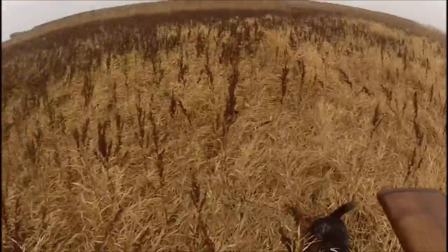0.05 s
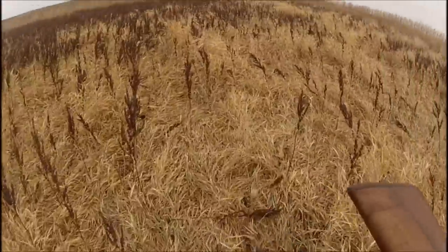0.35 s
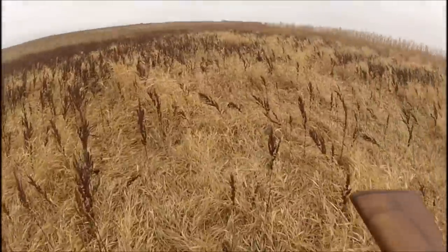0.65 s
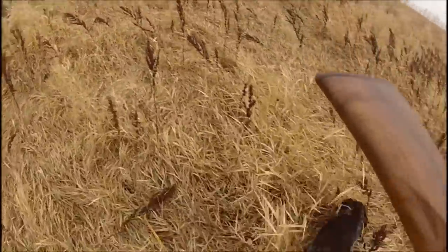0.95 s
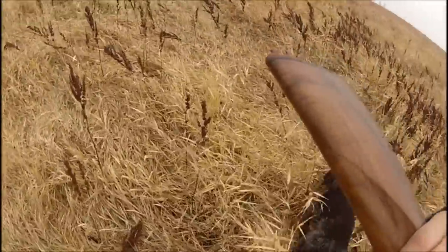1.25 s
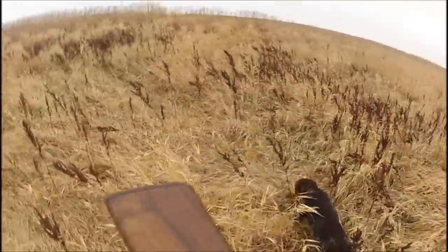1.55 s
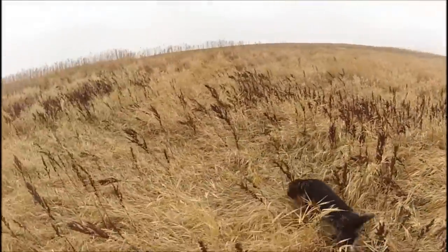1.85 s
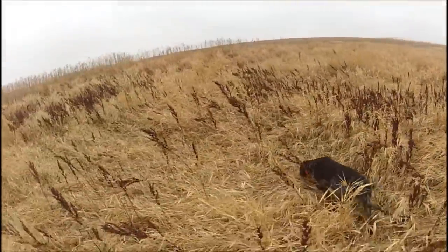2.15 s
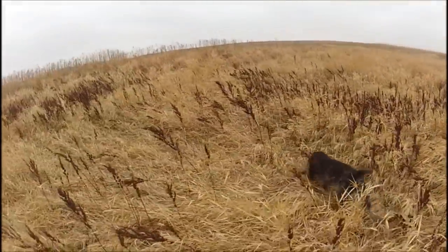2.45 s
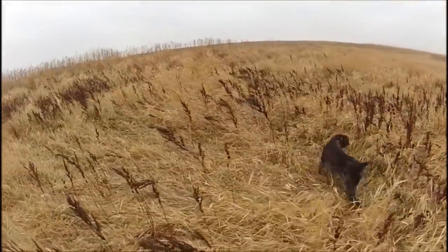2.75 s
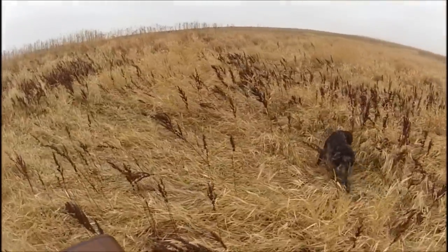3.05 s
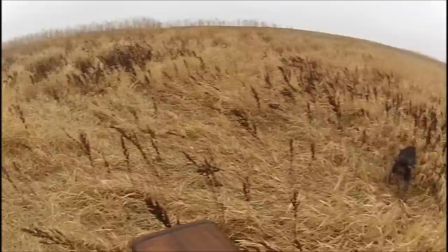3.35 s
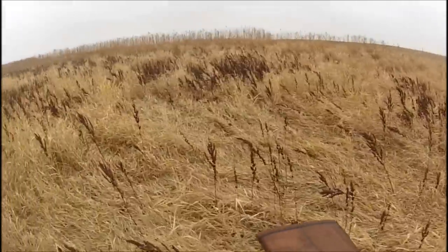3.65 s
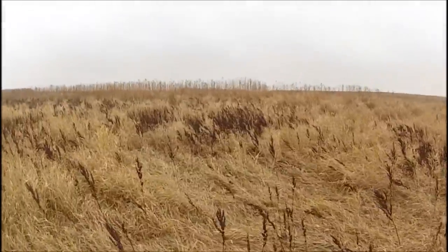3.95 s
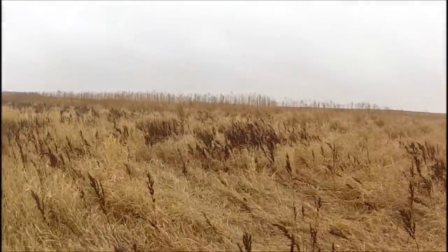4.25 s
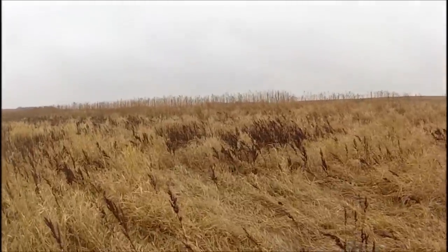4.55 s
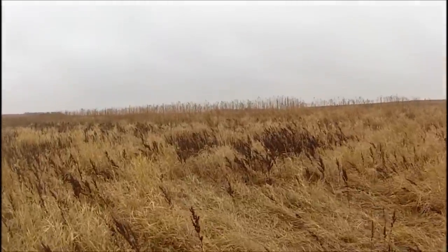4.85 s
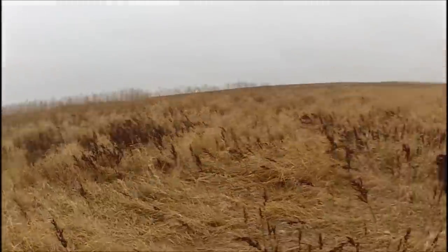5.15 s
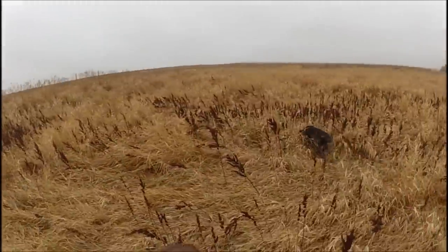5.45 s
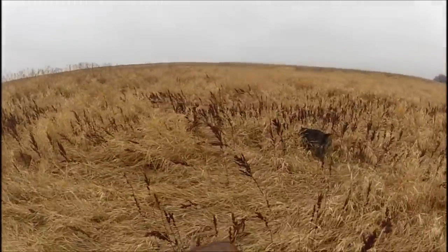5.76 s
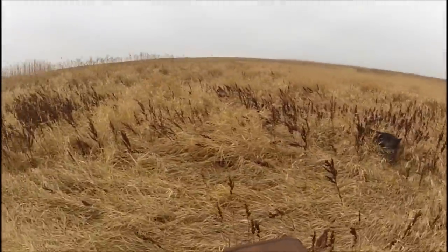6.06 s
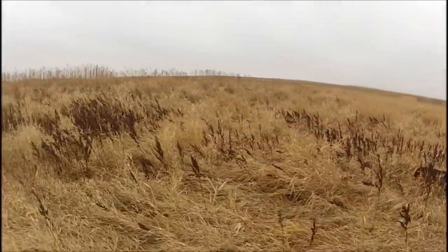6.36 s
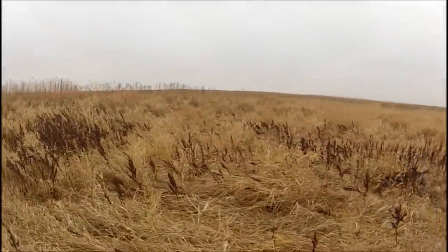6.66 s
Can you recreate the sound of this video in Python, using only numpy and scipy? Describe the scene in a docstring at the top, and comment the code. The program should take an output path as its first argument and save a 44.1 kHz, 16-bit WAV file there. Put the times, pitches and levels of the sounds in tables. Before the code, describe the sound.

Wind buffets a body-worn microphone in a closed plastic case, a low fluttering rumble with dull thumps through the first second. Beneath it, someone walks through tall dry grass: soft, crisp swishes come in uneven strokes throughout, with scattered tiny ticks of snapping stems. From about 1 to 2.5 seconds the wind nearly vanishes, exposing the rustle, faint clothing rubs and a few light, hollow knocks of gear on the case, near 1.1, 1.8 and 2.4 seconds. The wind returns at about 2.6 seconds and builds from 3.7. It is loudest between 4.6 and 5.4 seconds, with hard thumps, brief distorted rasps and one sharp hollow knock near 4.9. Weaker gusts continue over the swishing until the end at about 6.7 seconds. Everything is close, mono and somewhat muffled, with a thin fizz in the treble.

```python
"""Gusty wind on a camera microphone in a closed plastic case, carried through a field of tall dry grass.
The wind swells and drops; single gusts buffet the case and rumble in its cavity. Close by, blades swish
at each stroke of the legs and stems snap, while gear bumps the case and clothing rubs on it. Mono.
The camera samples at a low rate and holds each sample, which mirrors a thin fizz into the treble."""
import sys
import numpy as np
from scipy import signal
from scipy.fft import rfft, irfft, next_fast_len
from scipy.io import wavfile
from scipy.ndimage import uniform_filter1d, map_coordinates

SR = 44100
rng = np.random.default_rng(int(sys.argv[2]) if len(sys.argv) > 2 else 0)


def pcm_store(signal):
    """Save signal as 16-bit PCM."""
    levels = np.round(np.clip(np.atleast_2d(signal), -1, 1) * 32767)
    wavfile.write(sys.argv[1], SR, levels.astype(np.int16).T)


N = 295911


def amp(db):
    """Decibels to gain."""
    return 10 ** (np.asarray(db) / 20)


def unit(x):
    """x scaled to rms 1."""
    return x / np.sqrt(np.mean(x ** 2) + 1e-20)


def curves(rows):
    """One value per sample for each column after the time."""
    times, *columns = np.transpose(rows)
    return [np.interp(np.arange(N) / SR, times, column) for column in columns]


def wobble(rate):
    """A smooth random curve, rate knots a second."""
    knots = rng.standard_normal(int(N * rate / SR) + 4)
    return map_coordinates(knots, [np.arange(N) * rate / SR])


def filtered(x, response):
    """x through a gain given as a function of frequency."""
    size = next_fast_len(N + SR // 2)
    return irfft(rfft(x, size) * response(np.fft.rfftfreq(size, 1 / SR)), size)[:N]


def coloured(x, points):
    """x through (frequency [Hz], gain [dB]) points joined on a log axis."""
    point_hz, db = np.transpose(points)
    return filtered(x, lambda hz: amp(np.interp(np.log(hz + 1), np.log(point_hz), db)))


def steadied(x, seconds):
    """x with its fast flutter kept and its slow level held at rms 1."""
    size = int(seconds * SR)
    power = uniform_filter1d(uniform_filter1d(x ** 2, size), size)
    return x / np.sqrt(np.abs(power) + 1e-12)


def add(track, time, sound):
    """Mixes a sound into the track at a time in seconds."""
    start = max(round(time * SR), 0)
    track[start:start + len(sound)] += sound[:N - start]


def swell(peak_time, length, rise, edge_db, roundness):
    """Gain that climbs to 1 over the share `rise` of its length and is edge_db down at both ends."""
    offset = (np.arange(N) / SR - peak_time) / length
    away = np.abs(np.where(offset < 0, offset / rise, offset / (1 - rise)))
    return amp(-edge_db * np.minimum(away, 4) ** roundness)


def surges(base_db, base_bright_db, events, **shape):
    """Gains of a dull and a bright layer: the swells of all events add in power to a base."""
    dull, bright = amp(base_db) ** 2, amp(base_db + base_bright_db) ** 2
    for peak_time, length, db, bright_db in events:
        power = (amp(db) * swell(peak_time, length, **shape)) ** 2
        dull = dull + power
        bright = bright + power * amp(bright_db) ** 2
    return np.sqrt(dull), np.sqrt(bright)


def turbulence(spectrum, flutter_db):
    """Pressure noise that comes in lumps."""
    lumps = coloured(rng.standard_normal(N) * amp(flutter_db), spectrum)
    return steadied(lumps, seconds=.05)


def wind():
    """The largest eddies push, smaller ones rumble, the smallest flutter in the cavity of the case."""
    # slow push of the largest eddies: (time [s], level [dB])
    push = [(0, -27), (.58, -31.5), (.95, -35), (1.38, -51), (1.57, -42), (1.88, -60), (2.09, -43),
            (2.25, -57), (2.56, -35.5), (3, -36), (3.58, -42), (3.72, -29), (4.14, -29.5), (4.38, -40),
            (4.75, -21.5), (5.66, -37), (6, -21), (6.17, -34.5), (6.71, -32)]
    # wind between the gusts: (time [s], rumble [dB], small eddies over the rumble [dB])
    breeze = [(0, -22.5, -19), (.17, -19, -18.5), (.43, -20, -18.5), (.76, -28.5, -18.5), (.92, -28, -19),
              (1.34, -56.5, 2), (2.29, -58.5, 0), (2.66, -38.5, -14.5), (2.88, -22.5, -7.5),
              (3.33, -39, -11.5), (3.58, -44.5, -9), (4.42, -37, -10), (4.96, -16, -14), (5.25, -34.5, -7),
              (5.41, -19.5, -10), (5.67, -31, -12), (6, -20.5, -11.5), (6.13, -33, -12.5), (6.71, -28, -15)]
    # gusts on the case: (peak time [s], length [s], rumble [dB], small eddies over the rumble [dB])
    gusts = [(0.16, 0.13, -17.5, -14.5), (0.491, 0.023, -20, -7), (0.535, 0.061, -20.5, -13.5),
             (0.614, 0.07, -20.5, -12.5), (1.163, 0.21, -48, -22), (1.554, 0.25, -48.5, -22),
             (2.077, .26, -50.5, -1), (2.427, .17, -45.5, -18), (2.543, 0.15, -34.5, -18),
             (2.718, 0.16, -27.5, -7), (2.795, 0.19, -28.5, -6), (3.087, 0.076, -27, -11),
             (3.251, 0.16, -29, -15), (3.495, 0.11, -30.5, -19), (3.687, 0.1, -28, -29),
             (3.801, 0.19, -24.5, -19), (3.904, .21, -20.5, -18.5), (4.06, 0.18, -20, -14.5),
             (4.141, 0.23, -16.5, -19), (4.318, 0.17, -26.5, -13), (4.504, 0.23, -18.5, -15),
             (4.71, .22, -13.5, -14), (4.821, 0.1, -14.5, -18.5), (5.05, .21, -15, -10.5),
             (5.322, 0.13, -14, -12), (5.783, 0.15, -28, -7.5), (6.198, 0.1, -20, -11),
             (6.428, 0.15, -27.5, -13), (6.509, 0.07, -21.5, -9.5)]
    # spectra of the eddies, largest to finest: (frequency [Hz], level [dB])
    sway_spectrum = [(8, -17), (20, -8.5), (35, -5.5), (60, 0.5), (85, -6.5), (130, -8.5), (220, -36),
                     (500, -73.5)]
    rumble_spectrum = [(30, -30), (65, -3.5), (95, -1), (125, -0.5), (170, -2), (210, -6), (260, -5),
                       (350, -13.5), (500, -27), (800, -55), (1500, -87.5)]
    eddy_spectrum = [(100, -9.5), (250, -6), (380, 0), (500, -2.5), (640, -5), (780, -16), (950, -28),
                     (1300, -37.5), (2000, -43), (4000, -66)]
    whirl_spectrum = [(500, -10.5), (750, -6), (900, -2.5), (1100, -11), (1500, -22.5), (3000, -43)]
    sway_db, = curves(push)
    rumble_db, eddy_db = curves(breeze)
    force, eddy_force = surges(rumble_db, eddy_db, gusts, rise=.43, edge_db=21, roundness=2.06)
    flutter = wobble(70)
    sway = amp(sway_db) * steadied(turbulence(sway_spectrum, .8 * flutter), seconds=.16)
    rumble = force * turbulence(rumble_spectrum, 2.7 * flutter)
    eddy_gain = eddy_force * amp(1.5 * wobble(25))
    eddies = eddy_gain * turbulence(eddy_spectrum, 2 * flutter + 2.3 * wobble(160))
    # the more the flow breaks into small eddies, the more of those break up again
    whirl = amp(-16) * eddy_force ** 2 / force * turbulence(whirl_spectrum, 1.4 * flutter)
    return sway + rumble + eddies + whirl


def crackle(spectrum, rate, spread_db, hiss):
    """Tiny contacts of uneven size, rate a second, over the smooth hiss of sliding."""
    sizes = amp(spread_db * np.minimum(rng.exponential(size=N), 4))
    contacts = (rng.random(N) < rate / SR) * rng.standard_normal(N) * sizes
    return unit(coloured(unit(contacts) + hiss * rng.standard_normal(N), spectrum))


def grass():
    """Each stroke sweeps dry blades aside; brisk, close strokes add a crisp brush."""
    # legs and clothing in the grass: (peak time [s], length [s], swish [dB], brush over the swish [dB])
    strokes = [(0, 0.058, -41.5, -10.5), (0.104, 0.44, -52.5, -2.5), (0.386, 0.47, -50, -3.5),
               (0.567, 0.62, -50.5, -3), (1.013, 0.51, -54.5, -4), (1.142, 0.28, -51.5, -6),
               (1.348, 0.54, -52, -4), (1.62, .45, -56.5, -10.5), (1.827, 0.3, -55, -4.5),
               (2.023, 0.62, -51.5, -5), (2.27, 0.19, -56.5, -1.5), (2.558, 1, -56, -6),
               (2.802, 0.2, -55.5, -3), (3.046, 0.62, -61, -9), (3.398, 0.38, -55.5, -5),
               (3.613, 0.29, -58.5, 0.5), (3.833, 0.22, -62, -5), (4.087, 0.24, -60, -12),
               (4.279, .5, -58.5, 2.5), (4.46, 0.47, -56.5, 2.5), (5.075, 0.19, -54, -1.5),
               (5.156, 0.43, -54, -2.5), (5.41, .4, -62, -4.5), (5.79, 0.45, -55.5, -2),
               (5.88, 0.18, -57, 0.5), (6.04, 0.78, -57, -3), (6.322, 0.4, -56, -14),
               (6.675, 0.26, -52, -0.5)]
    # spectra of the sliding blades: (frequency [Hz], level [dB])
    swish_spectrum = [(300, -11), (680, 4.5), (1000, -7.5), (1400, -5), (1700, -7.5), (2400, -3.5),
                      (3200, -3), (3900, -5.5), (4400, -15.5), (5000, -16), (6000, -15.5)]
    brush_spectrum = [(1500, -33.5), (3000, -8), (3900, 5), (4400, 4), (5100, 4.5), (6000, -10.5)]
    field_db, field_brush_db = -63, -9.5  # the field's steady rustle, and its brush relative to that
    sweep, briskness = surges(field_db, field_brush_db, strokes, rise=.37, edge_db=17.5, roundness=1.38)
    catch_db = .34 * wobble(35)  # blades catch and slip
    swish = sweep * crackle(swish_spectrum, rate=2500, spread_db=2, hiss=1.34)
    brush = briskness * crackle(brush_spectrum, rate=2000, spread_db=2, hiss=1.4)
    return amp(catch_db) * (swish + brush)


def through_case(x):
    """The thin walls let a few narrow bands through to the microphone more strongly."""
    # wall resonances: (frequency [Hz], width [Hz], lift [dB])
    modes = [(2620, 120, 2.5), (2945, 93, 4.5), (3530, 160, 0.7), (3890, 130, 1.5), (4740, 150, 1.5)]
    return filtered(x, lambda f: amp(sum(db * np.exp(-((f - hz) / width) ** 2) for hz, width, db in modes)))


def slaps():
    """A hard eddy swells and collapses against the case within a few uneven cycles."""
    # the hardest single eddies: (time [s], peak level [dB], pitch [Hz])
    hard_eddies = [(0.139, -13, 156), (0.479, -10, 114), (0.491, -12, 263), (0.839, -17, 84),
                   (0.914, -22, 94), (3.84, -18.5, 130), (4.155, -10.5, 165), (4.691, -7, 141),
                   (4.771, -10.5, 257), (4.825, -13, 135), (4.926, -8, 123), (5.036, -5, 205),
                   (5.329, -7, 203), (6.512, -16, 265)]
    half_width_cycles = 1.15
    out, t = np.zeros(N), np.arange(-SR // 20, SR // 20) / SR
    for time, db, hz in hard_eddies:
        phase = 2 * np.pi * (hz * t + rng.random()) + .61 * wobble(241.2)[:len(t)]
        envelope = amp(db) * np.exp(-(t * hz / half_width_cycles) ** 2)
        add(out, time + t[0], envelope * np.sin(phase))
    return out


def rasp(pressure):
    """The hardest pressure peaks distort the microphone with a brief rasp."""
    spectrum = [(500, -20.5), (1000, 1.5), (1400, -4), (1950, -13), (2400, -18), (5000, -43)]
    distortion = unit(coloured(rng.standard_normal(N), spectrum))
    force = uniform_filter1d(np.minimum(np.abs(pressure), .55) ** 3, size=SR // 160)
    return amp(-19) * force * distortion


def snaps():
    """A dry stem breaks with a tick of a few milliseconds."""
    # breaking stems: (time [s], level before colouring [dB])
    stems = [(0.3655, -44), (0.599, -38), (0.953, -42), (1.079, -48), (1.804, -43.5), (2.625, -47),
             (3.375, -46.5), (4.273, -47), (5.156, -34), (5.227, -44), (5.877, -41.5)]
    out, t = np.zeros(N), np.arange(SR // 30) / SR
    attack = 1 - np.exp(-t / .0006)
    for time, db in stems:
        add(out, time, amp(db - 60 * t / .02) * attack * rng.standard_normal(len(t)))
    return coloured(out, [(800, -34), (1800, -11), (2800, 3), (4300, 7.5), (5500, -5.5)])


def bumps():
    """Each soft knock of gear rings the case for a few cycles."""
    # gear on the case: (time [s], level [dB], ring [Hz])
    knocks = [(1.033, -30.5, 790), (1.143, -29, 660), (1.7105, -35.5, 830), (1.731, -31.5, 700),
              (1.771, -32, 604), (1.8335, -22.5, 610), (1.8415, -36, 610), (2.4345, -23, 624),
              (2.4435, -25, 560), (4.909, -8.5, 600)]
    ring_s = .021  # time to fall 60 dB
    out, t = np.zeros(N), np.arange(SR // 16) / SR
    attack = (1 - np.exp(-t / .0015)) ** 2
    for time, db, hz in knocks:
        add(out, time, amp(db - 60 * t / ring_s) * attack * np.sin(2 * np.pi * hz * t))
    return out


def rubs():
    """Cloth drags over the case in small slips and stirs its hollow ring."""
    # clothing on the case: (start [s], length [s], level [dB])
    drags = [(1.082, 0.13, -47), (1.395, 0.069, -52), (1.6, 0.086, -54.5)]
    # hollow ring of the rubbed case: (frequency [Hz], level [dB])
    spectrum = [(200, -15), (400, -2), (560, 3), (650, 8), (770, -19), (900, -16), (1400, -21), (2500, -41)]
    envelope = np.zeros(N)
    for start, length, db in drags:
        add(envelope, start, amp(db) * np.sqrt(np.abs(np.hanning(int(length * SR)))))
    return envelope * crackle(spectrum, rate=400, spread_db=2.5, hiss=.93)


def overload(x):
    """The microphone rounds off the very largest swings."""
    return x / (1 + np.abs(x / .85) ** 8) ** (1 / 8)


def scene():
    """Wind and handling right on the case, grass just outside it, at one microphone."""
    pressure = wind() + slaps()
    handling = bumps() + rubs()
    return (pressure + rasp(pressure) + handling + through_case(grass() + snaps()))[None]


def record(dry):
    """The camera samples the microphone at a low rate, holds each sample and cuts the top treble."""
    # the camera's anti-alias filter: (frequency [Hz], gain [dB])
    anti_alias = [(5100, 0.5), (5450, 2), (5750, 1), (6000, -3.5)]
    hold_hz, top_hz = 12000, 15400
    seconds = N // SR + 1
    microphone = coloured(overload(dry[0]), anti_alias)
    narrow = filtered(microphone, lambda hz: hz < hold_hz / 2)
    samples = signal.resample(np.pad(narrow, (0, seconds * SR - N)), seconds * hold_hz)
    # the held steps mirror everything around the sampling rate
    steps = signal.resample(np.repeat(samples, 4), seconds * SR)[:N]
    return filtered(steps, lambda hz: hz < top_hz)[None]


dry = scene()
out = record(dry)
pcm_store(out)
```